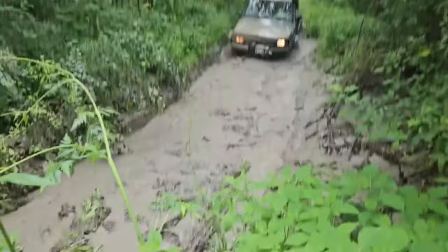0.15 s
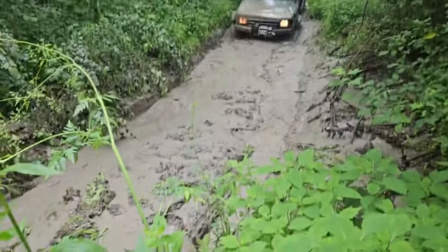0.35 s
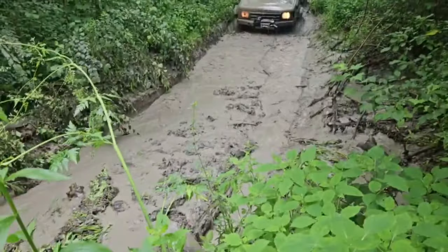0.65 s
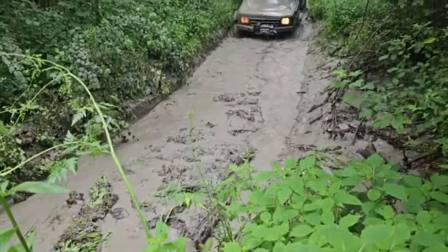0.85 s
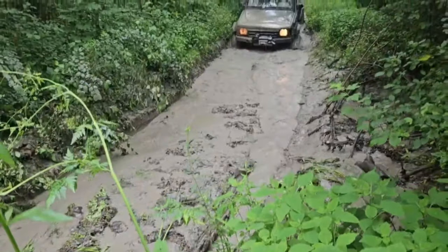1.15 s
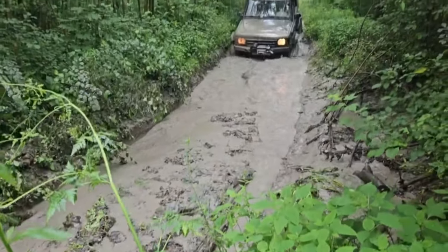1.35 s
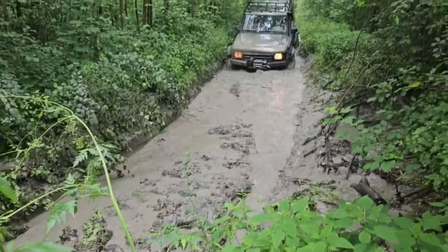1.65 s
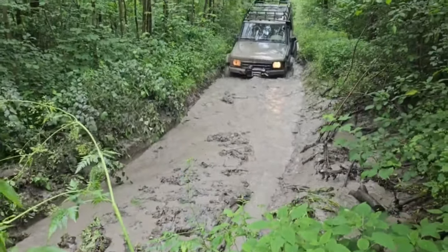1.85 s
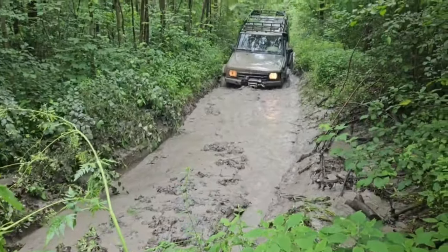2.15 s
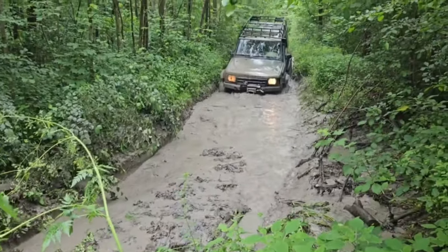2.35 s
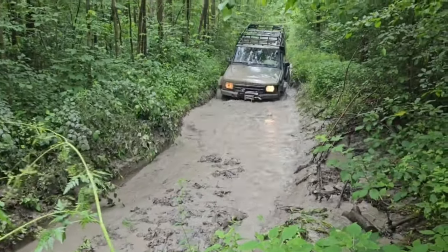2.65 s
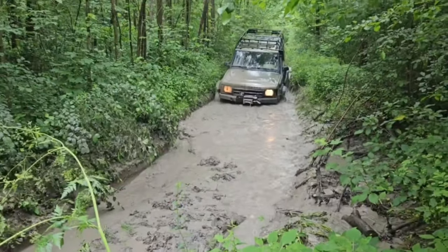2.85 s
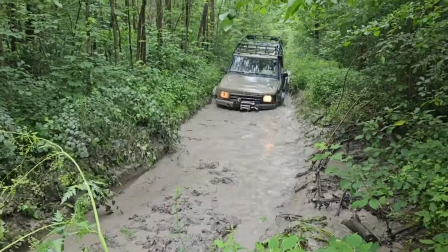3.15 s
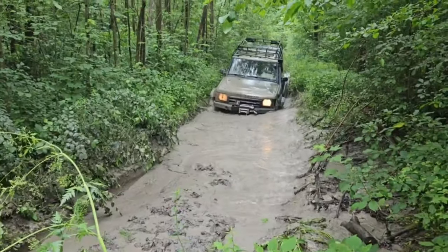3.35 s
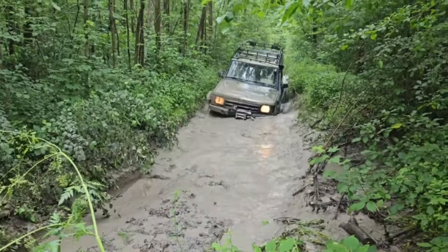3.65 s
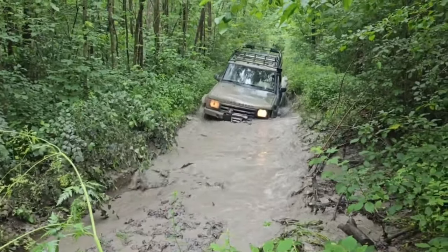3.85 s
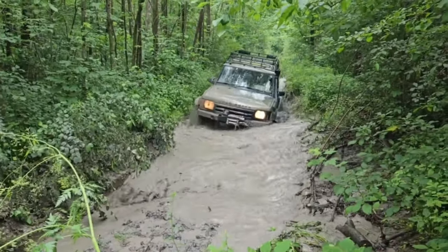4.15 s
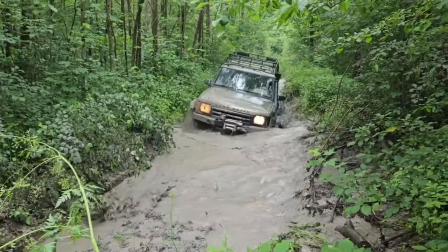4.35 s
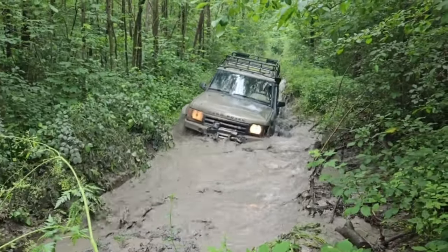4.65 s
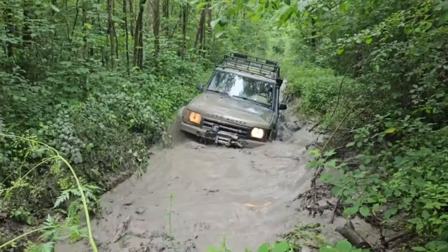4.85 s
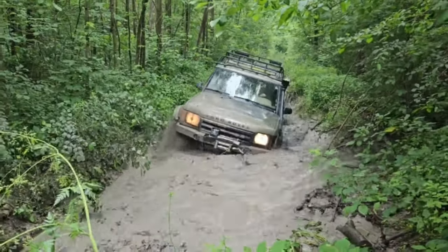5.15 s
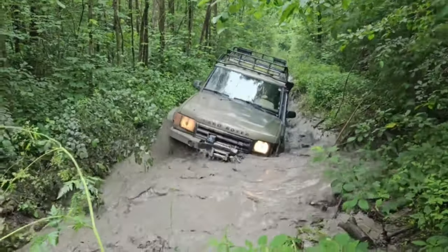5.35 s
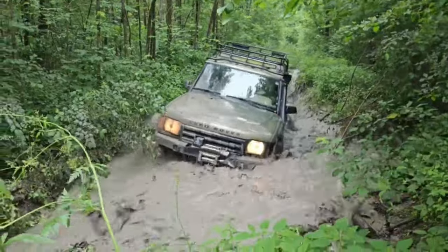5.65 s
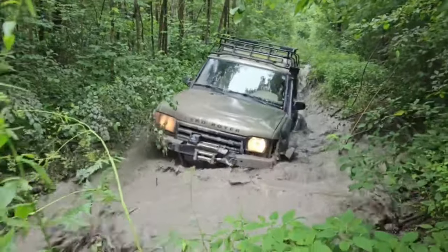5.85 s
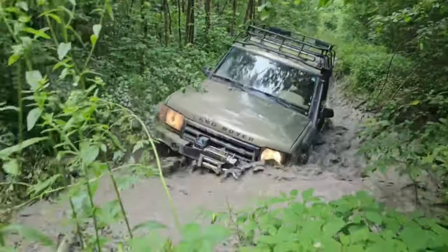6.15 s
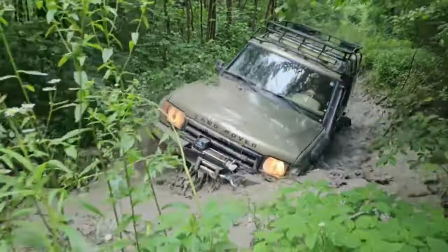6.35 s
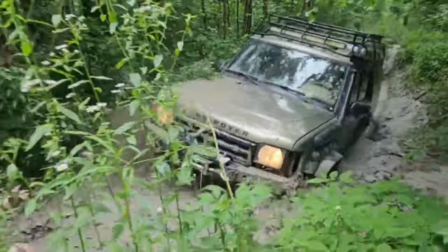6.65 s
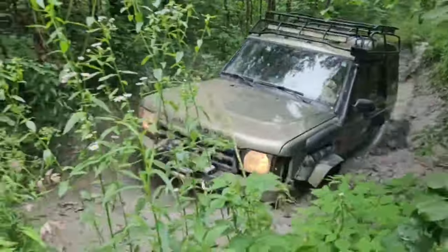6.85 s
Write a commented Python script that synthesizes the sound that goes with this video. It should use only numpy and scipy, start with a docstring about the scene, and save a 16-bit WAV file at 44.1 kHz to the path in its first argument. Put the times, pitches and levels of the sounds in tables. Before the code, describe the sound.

Uneven eight-cylinder engine sinks to a low burble, surges into a strained high roar, and churns nearer through a flooded forest track.

```python
"""An eight-cylinder off-road vehicle coasts into a flooded forest track, then revs and ploughs nearer, splashing.
The uneven firing of its two banks hums as crank-locked tones and a rumble, which mud keeps half choking.
Fan and intake noise, spray, ringing bubbles and breathy exhaust hollows roar above it.
Direct sound reaches the left microphone port a little before the right; scattered sound differs at each."""
import sys
import numpy as np
from scipy import signal
from scipy.fft import rfft, irfft, next_fast_len
from scipy.io import wavfile
from scipy.ndimage import uniform_filter1d

SR = 44100
rng = np.random.default_rng(int(sys.argv[2]) if len(sys.argv) > 2 else 0)


def bounce(signal):
    """Save signal as a 16-bit WAV file at the path given by the first command-line argument."""
    frames = np.transpose(np.atleast_2d(signal))
    limited = np.clip(frames, -1, 1)
    pcm = np.round(limited * 32767).astype(np.int16)
    wavfile.write(sys.argv[1], SR, pcm)


def volts(x):
    """Linear amplitude factor 10**(x/20) for a level x in dB, scalar or array-like."""
    e = np.asarray(x, float) / 20
    return 10 ** e


N = 308259
TIME = np.arange(N) / SR
FREQ = np.fft.rfftfreq(next_fast_len(N), 1 / SR)

# guide level that the roar, bubbles, spray and rasp follow as the vehicle nears: (time [s], level [dB])
ROAR = [(0.0, -40), (1.03, -44), (2.47, -46.5), (2.84, -46), (3.44, -44.5), (3.65, -41), (4.45, -38),
        (5.25, -36), (5.95, -33.5), (6.5, -32.5), (6.97, -35.5)]
# surges of water against the body:
# (time [s], half length [s], roar change [dB], bubble change [dB])
SPLASHES = [(.63, 0.085, 1.5, 8), (1.18, 0.043, 3.5, 7), (3.4, 0.25, 3, -8), (4.5, 0.12, 1, 10),
            (5.3, 0.32, 0, -13), (5.7, 0.084, -0.5, -2), (5.93, .06, 0.5, 2), (6.07, .15, 1.5, 2.5),
            (6.28, 0.037, -1, 14.5), (6.39, 0.054, 2.5, 9), (6.47, 0.074, 3, 10), (6.68, 0.11, 1.5, 6)]
# the engine: (time [s], firing rate [Hz], drive of the even firing [dB], drive of the banks' burble [dB])
ENGINE = [(0.0, 132, -21.5, -40), (0.05, 134.6, -16.5, -32), (0.13, 117.2, -23, -17),
          (0.33, 103.5, -18, -17), (0.6, 98.7, -14, -17), (0.74, 86.4, -16, -34), (0.97, 78.9, -18, -26),
          (1.2, 74.2, -18, -22), (1.48, 72.53, -19, -15), (2.04, 61.2, -19.5, -34), (2.33, 56.4, -19, -32),
          (2.46, 52.7, -6.5, -24), (2.56, 59.4, -9.5, -18), (2.7, 73.5, -9, -14), (2.85, 96.4, -13, -12),
          (2.99, 123.6, -12.5, -11), (3.32, 170.3, -11.5, -18), (3.45, 187.3, -13, -16),
          (3.6, 199.3, -15.5, -15.5), (3.89, 207.1, -15, -16.5), (4.07, 200.9, -13.5, -15),
          (4.2, 189.4, -17.5, -15), (4.52, 205.9, -17, -16.5), (4.74, 215.7, -15.5, -12.5),
          (4.83, 223.8, -12, -15), (4.94, 219.1, -14.5, -17.5), (5.34, 226.5, -6.5, -12.5),
          (5.55, 242.5, -21.5, -16.5), (5.89, 243.6, -13.5, -17.5), (5.97, 239, -20.5, -12.5),
          (6.12, 240.7, -24, -16), (6.41, 254.1, -12, -20.5), (6.68, 254.2, -13, -21.5),
          (6.79, 259.7, -13.5, -21), (6.99, 253, -18, -20)]
# what the exhaust passes of the weak tones and the rumble: (frequency [Hz], level [dB])
PIPE = [(20, -45), (40, 3), (62, -0.5), (90, -4), (115, 2.5), (135, -3.5), (158, 3.5), (200, -8.5),
        (260, -1), (310, -6.5), (400, -8), (460, -11), (515, -12), (580, -6), (800, -27)]


def curve(table):
    """Columns of a table joined by straight lines in time."""
    times, *columns = np.transpose(table)
    return [np.interp(TIME, times, column) for column in columns]


def bumps(table):
    """Each row swells and fades in a straight line about its time; one sum for each column."""
    s, half, *columns = np.transpose(table)
    coarse = TIME[::64]
    shapes = np.clip(1 - np.abs(coarse - s[:, None]) / half[:, None], 0, 1)
    return [np.interp(TIME, coarse, column @ shapes) for column in columns]


def along(table, hz):
    """Value of a (frequency, value) table on a log-frequency axis."""
    f, v = np.transpose(table)
    return np.interp(np.log(np.maximum(hz, 1)), np.log(f), v)


def shape(x, gain):
    """Filter by a gain given at every frequency."""
    size = next_fast_len(N)
    return irfft(rfft(x, size) * gain, size)[..., :N]


def unit(x):
    """Scale to rms 1."""
    return x / np.sqrt(np.mean(x ** 2))


def walk(rate):
    """Smooth random wander: levels held for 1 / rate seconds and slewed twice, rms about 0.45."""
    k = int(SR / rate)
    held = np.repeat(rng.standard_normal(N // k + 1), k)
    return 0.6 * uniform_filter1d(uniform_filter1d(held, k), k)[:N]


def resonance(hz, width_hz):
    """Noise through a single peak of rms 1; the gain halves at half the width to either side."""
    return unit(shape(rng.standard_normal(N), 1 / (1 + (2 * (FREQ - hz) / width_hz) ** 2)))


def ground():
    """A deep, dull rumble below the engine's tones: noise in a broad peak at 40 Hz."""
    gain = np.exp(-np.log(np.maximum(FREQ, 1) / 40) ** 2 / 0.14)
    return volts(-45.5) * unit(shape(rng.standard_normal(N), gain))


def ticks():
    """Faint high ticks in the undergrowth, each a rough tone that dies in a few milliseconds."""
    # (time [s], frequency [Hz], level [dB])
    tick_list = [(0.897, 12500, -44), (1.462, 12500, -37), (1.865, 3300, -33)]
    decay_s = .003
    out, age = np.zeros(N), np.arange(1024) / SR
    for s, hz, db in tick_list:
        roughness = 1 + 0.7 * uniform_filter1d(rng.standard_normal(1024), size=8)
        start = int(s * SR)
        tone = np.exp(-age / decay_s) * np.sin(2 * np.pi * hz * age)
        out[start:start + 1024] += volts(db) * roughness * tone
    return out


def churn(per_s=500, spread_db=2.5, low_hz=350, octaves=2.6):
    """Bubbles that ring a few cycles and glide up as they burst; each is heard from its own side."""
    draw = rng.random((int(per_s * N / SR), 4))
    out, age = np.zeros((2, N + 1280)), np.arange(1280) / SR
    for when, pitch, size, side in draw:
        hz = low_hz * 2 ** (octaves * pitch ** 1.5)
        glide = 1 + 0.011 * hz * age
        ring = np.exp(-age * hz / 2.9) * np.sin(2 * np.pi * hz * age * glide)
        start = int(when * N)
        loudness = volts(-spread_db * np.log(size + .03))  # a few are much louder than the rest
        out[:, start:start + 1280] += loudness * np.outer([side + .5, 1.5 - side], ring)
    # bubbles rise faster than the roar
    return unit(out[:, :N]) * volts(16 + 1.61 * curve(ROAR)[0] + bumps(SPLASHES)[1])


def spray():
    """Spray drumming on the bodywork: a broad, grainy ring that climbs steeply and leaps with splashes."""
    level_db = 39.5 + 2.48 * curve(ROAR)[0] + 1.3 * bumps(SPLASHES)[0]
    return resonance(2200, 530) * volts(level_db + 3 * walk(40))


def rasp():
    """Gas rushing past two hollows of the exhaust gives a breathy, wavering growl at their pitches."""
    # (frequency [Hz], width [Hz])
    hollows = [(320, 86.7), (525, 56)]
    # harder blowing: (time [s], half length [s], low hollow change [dB], high hollow change [dB])
    gusts = [(.65, 0.081, 5, 4.3), (1.18, .06, 10, 8), (2.0, 0.24, 4, .5), (2.5, .3, 3.4, .5),
             (3.4, 0.37, 7.6, 7.4), (4.2, .25, 1, 3), (4.5, 0.13, 6, 21), (5.02, 0.19, 6, 20),
             (5.65, 0.46, 16.5, .5), (6.45, .2, 4.9, 12)]
    flow_db = 1.402 * curve(ROAR)[0]
    out = np.zeros(N)
    for (hz, width_hz), offset_db, gust_db in zip(hollows, (8.5, 1.5), bumps(gusts)):
        out += volts(offset_db + flow_db + gust_db) * resonance(hz, width_hz)
    return out


def diffuse(colour, lo_hz, hi_hz, flicker_db, tilt_db, count):
    """Noise, rms 1 between two edges before each octave flickers alone: direct part, then a part per port."""
    # likeness of the two ports: (frequency [Hz], shared power [0-1])
    alike_table = [(100, .995), (300, .96), (600, .88), (1000, .73), (1500, .64), (2000, .47), (2700, .15),
                   (5000, .1), (15000, .02)]
    size = next_fast_len(N)
    gain = volts(along(colour, FREQ))
    inside = (FREQ > lo_hz) & (FREQ < hi_hz)
    gain = gain / np.sqrt(np.sum(gain[inside] ** 2) / len(FREQ))
    alike = along(alike_table, FREQ)
    shares = np.sqrt([alike, 1 - alike, 1 - alike])
    spectra = rfft(rng.standard_normal((3, N)), size) * gain * shares
    octave = np.log2(np.maximum(FREQ, 1) / 125)
    out = np.zeros((3, N))
    for k in range(count):
        band = np.cos(np.pi / 2 * np.clip(octave - k, -1, 1)) ** 2
        # the tilt acts on the octaves at 8 and 16 kHz
        flicker = volts(flicker_db * walk(9) + tilt_db * max(k - 5, 0))
        out += irfft(spectra * band, size)[:, :N] * flicker
    return out


def roar(turns, throb=0.049):
    """Fan and intake noise throbbing faintly with the crank; splashes make the hiss surge a little."""
    # colours of the body and of the hiss: (frequency [Hz], relative level per Hz [dB])
    body_colour = [(150, 13), (300, 3.5), (430, -3.5), (530, -1.5), (700, -1.5), (1000, -5), (1400, -4.5),
                   (1800, -11.5), (2600, -21.5)]
    hiss_colour = [(900, -2.5), (1600, 3), (2200, -0.5), (4000, -1.5), (6800, -4.5), (7200, -2), (8900, -2),
                   (9500, -9), (11300, -8.5), (12600, -4), (13600, -10), (14300, -8.5), (15700, -13)]
    near_db, surge_db = curve(ROAR)[0], bumps(SPLASHES)[0]
    # the body follows a share of the guide level and grows by 2 dB per octave of engine speed
    speed_db = 2 * np.log2(curve(ENGINE)[0] / 100)
    body_db = -12.5 + .6 * near_db + speed_db + surge_db
    hiss_db = near_db + 0.45 * surge_db
    # the nearer and louder the spray, the less treble the air takes from it
    brighter_db = 0.17 * (hiss_db - np.mean(hiss_db))
    body = diffuse(body_colour, 285, 2100, flicker_db=2.65, tilt_db=0, count=6)
    body = body * volts(body_db + 1.0 * walk(8.7))
    hiss = diffuse(hiss_colour, 2270, 14800, flicker_db=0.7, tilt_db=brighter_db, count=8)
    hiss = hiss * volts(hiss_db + 1.5 + 0.75 * walk(15) + 0.77 * walk(60))
    pulse = 1 + throb * np.sin(2 * np.pi * 3 * turns)
    return pulse * (body + hiss)


def whine(turns):
    """A belt-driven whine locked to the crank, heard while the vehicle faces the microphones."""
    from_s, to_s, fade_s, per_cycle = 5.25, 6.5, .12, 45.1
    heard = np.clip(np.minimum(TIME - from_s, to_s - TIME) / fade_s + .5, 0, 1)
    level_db = -44.5 + 6 * (TIME - from_s)  # rms, climbing 6 dB per second
    tone = np.sqrt(2) * np.sin(2 * np.pi * per_cycle * turns)
    return heard * volts(level_db + 1.64 * walk(15)) * tone


def rumble(turns):
    """Firings that each differ in strength; a puff lasts one interval, so it brightens with speed (rms 1)."""
    firing = 8 * turns
    strength = rng.standard_normal(N // 100)[firing.astype(int)]
    puffs = strength * np.sin(np.pi * firing) ** 4
    return unit(shape(puffs, volts(along(PIPE, FREQ))))


def exhaust(turns):
    """Tones locked to the crank, as even firing and as the banks' burble, plus weak tones and a rumble."""
    # the note drops out for a moment, or one part swells:
    # (time [s], half length [s], even firing change [dB], burble change [dB])
    chokes = [(0.22, 0.18, -12.5, -2), (0.74, 0.034, -7, 0), (1.15, 0.083, -2, -1), (2.2, 0.059, 2, -17),
              (3.27, 0.098, -5, -2.5), (4.1, 0.14, -12.5, 1.5), (4.61, 0.083, -6.5, -8.5),
              (4.74, 0.069, -19, -14.5), (4.89, 0.041, -13, -9), (5.07, 0.041, -11, -7),
              (5.23, 0.058, -11, -16), (5.34, 0.087, -13, -7), (5.44, 0.047, -11.5, -13),
              (5.52, 0.062, -18.5, -1), (5.555, .03, 3, -23), (5.69, 0.032, -2.5, -11),
              (5.78, 0.063, 0, -4), (5.91, .06, -11, -6), (6.05, 0.083, -8, -1), (6.29, 0.045, -6, -4),
              (6.36, .05, -10, -5), (6.45, .05, -9.5, -5), (6.6, 0.082, -4.5, -1)]
    # tones of the even firing and of the burble: vibrations per cycle: level against their drive [dB]
    even_tones = {8: 0, 7: -22.5, 10: -27.5, 11: -28.5}
    burble_tones = {3: 0, 5: -7.5} | {2: -5.5}
    # how well the tailpipe radiates the even tones: (frequency [Hz], level [dB])
    outlet = [(42, -33), (55, -13), (68, -3.5), (90, -0.1), (112, -1), (135, -0.5), (155, -6), (180, -1.5),
              (215, -4.5), (255, 0.2), (272, -0.5), (295, 5), (318, -11), (340, 3), (360, -18)]
    # how well the burble radiates: (frequency [Hz], level [dB])
    banks = [(20, -34), (40, -31), (52, -21), (59, -6.5), (65, -2), (75, -2.5), (95, 0.4), (105, 3.5),
             (130, 1), (142, 1.5), (151, -21), (162, 0)]
    # the tone at twice the firing rate rings in the silencer: (frequency [Hz], level [dB])
    silencer = [(105, -20), (120, -21), (150, -19.5), (175, -31.5), (205, -41), (235, -29), (265, -23.5),
                (325, -37.5), (355, -31), (400, -43), (470, -39.5), (510, -33)]
    # weaker tones from unequal cylinders: (vibrations per cycle, relative level [dB])
    weak_tones = [(4, -26), (6, -19), (9, -21), (12, -24), (13, -24), (14, -27), (15, -26), (17, -27),
                  (18, -27), (19, -19), (21, -23), (24, -25)]
    typical_db = -16  # usual loudness of the strong tones

    firing_hz, even_db, burble_db = curve(ENGINE)
    cycle_hz = firing_hz / 8
    even_drop, burble_drop = bumps(chokes)
    even_db, burble_db = even_db + even_drop, burble_db + burble_drop
    level = {}
    for k, db in even_tones.items():
        share = 1 if k == 8 else 0.5  # the lesser even tones follow half the drive
        level[k] = db + even_db * share + along(outlet, k * cycle_hz)
    for k, db in burble_tones.items():
        level[k] = db + burble_db + along(banks, k * cycle_hz)
    level[16] = 0.39 * even_db + along(silencer, 2 * firing_hz)

    # loudness of the strong tones; weak tones and rumble follow it but fill in where the note drops out
    strong = (3, 5, 8, 16)
    fill_db = -.45 * (even_drop + burble_drop) / 2
    effort = np.sqrt(sum(volts(level[k]) ** 2 for k in strong)) * volts(fill_db - typical_db)
    # the strong tones flutter a little, the lesser ones wander, faster the higher they are
    tones = []
    for k, db in level.items():
        wander_db = 2.14 * walk(21.983) if k in strong else 4.5 * walk(3 * k)
        tones.append((k, volts(db + wander_db)))
    weak = effort ** 0.66 * volts(typical_db - 3.5)
    for k, db in weak_tones:
        tones.append((k, weak * volts(db + along(PIPE, k * cycle_hz) + 4.5 * walk(1.5 * k))))

    out = np.zeros(N)
    for k, gain in tones:
        # multiples of the firing rate peak together, making a sharp pulse; the others start at any phase
        phase = (k % 8 > 0) * rng.random()
        out += np.sqrt(2) * gain * np.cos(2 * np.pi * (k * turns + phase))
    # the rumble grows as the burble overtakes the even firing
    rough_db = .25 * np.clip(burble_db - even_db, -15, 10)
    return out + volts(typical_db - 24 + rough_db) * effort ** .8 * rumble(turns)


def scene():
    """Direct sound reaches the right port late; scattered sound differs at each port."""
    # left minus right: (frequency [Hz], level [dB])
    tilt = [(60, .8), (110, 1), (200, 2), (700, 2), (1290, 1.3), (2380, 2.4), (8120, 2.6), (15000, -1)]
    # how far the left port leads: (frequency [Hz], phase [radians])
    lead = [(120, 0), (215, .24), (260, .33), (500, .58), (800, .9), (1000, 1.13), (1200, 1.5),
            (1600, 2.55), (2000, 4), (2700, 6.9), (5000, 12)]
    # echo delay at the left and right port [s]
    echo_s = (.041, .058)
    turns = np.cumsum(curve(ENGINE)[0] / 8) / SR  # engine cycles of eight firings
    direct, *scattered = roar(turns)
    engine = exhaust(turns) + whine(turns)
    direct = direct + ground() + rasp() + spray() + ticks() + engine
    # trees return a faint echo of the engine, later at one port than at the other
    echo = [volts(-40) * np.r_[np.zeros(int(s * SR)), engine][:N] for s in echo_s]
    late = np.exp(-1j * along(lead, FREQ))
    ports = np.array([direct, shape(direct, late)]) + scattered + churn() + echo
    return shape(ports, volts(np.outer([.5, -.5], along(tilt, FREQ))))


def low_pass(x):
    """Removes everything above the highest recorded frequency."""
    return signal.sosfilt(signal.butter(12, 15690, fs=SR, output="sos"), x)


def record(dry):
    """The finished stereo mix as it is stored."""
    return low_pass(dry)


dry = scene()
out = record(dry)
bounce(out)
```